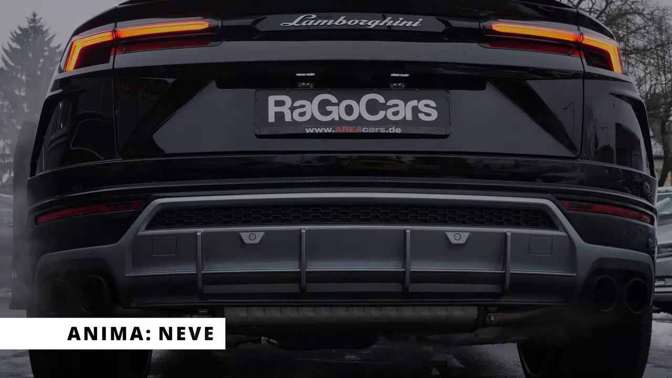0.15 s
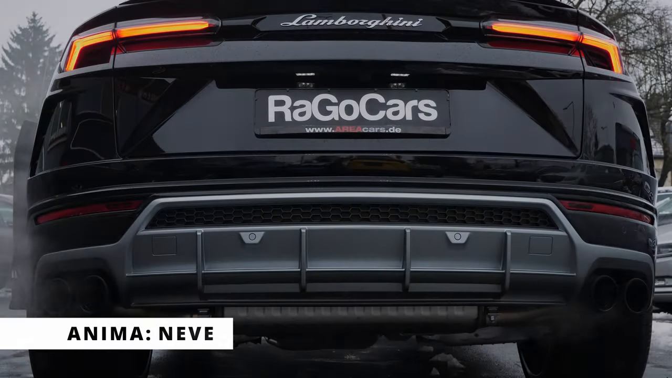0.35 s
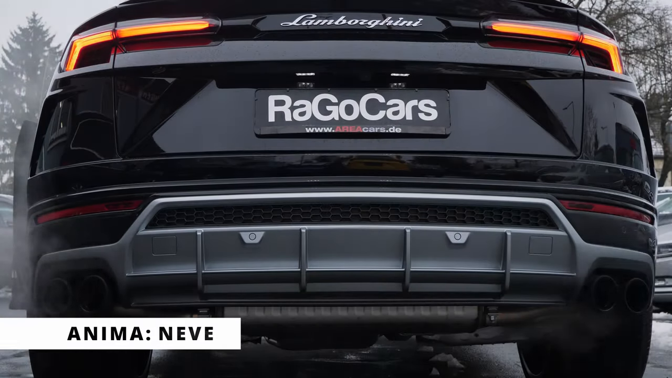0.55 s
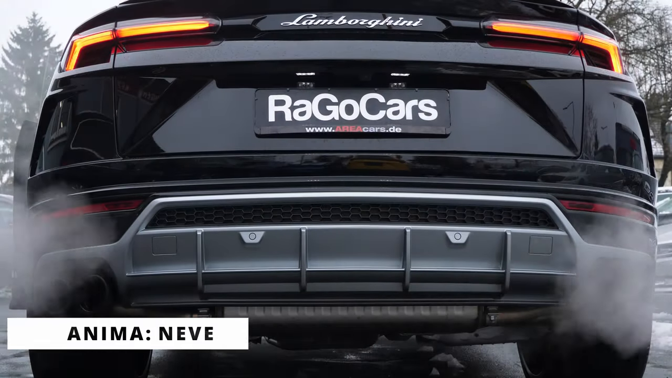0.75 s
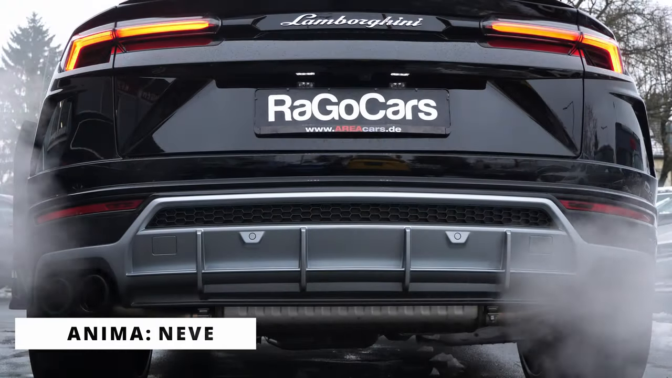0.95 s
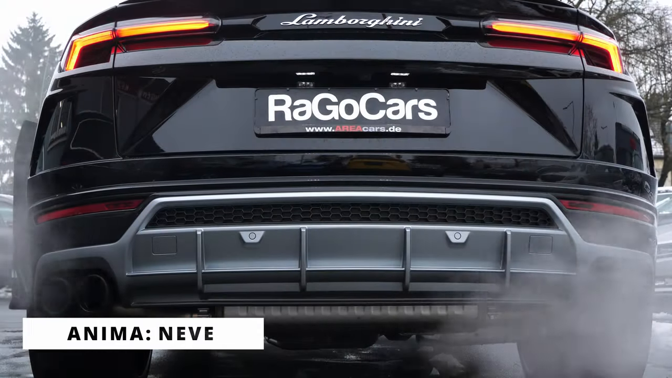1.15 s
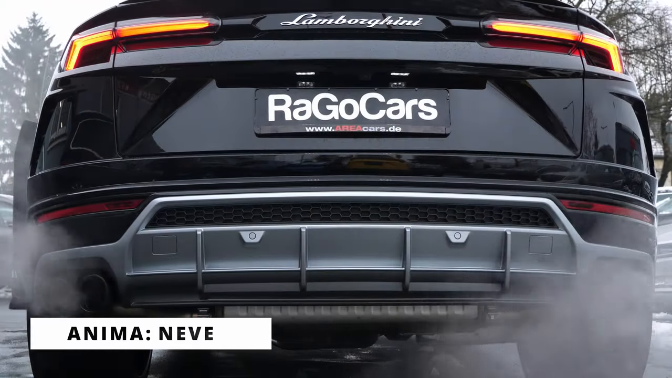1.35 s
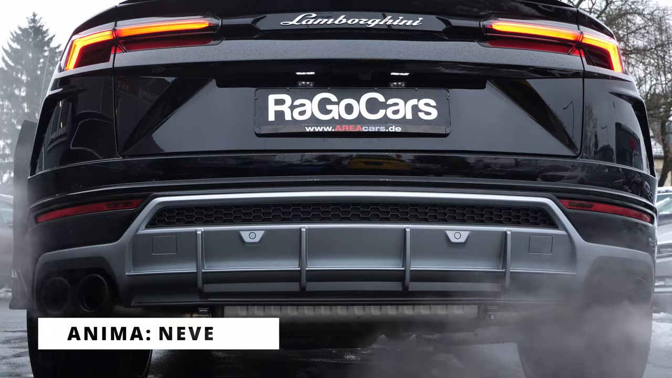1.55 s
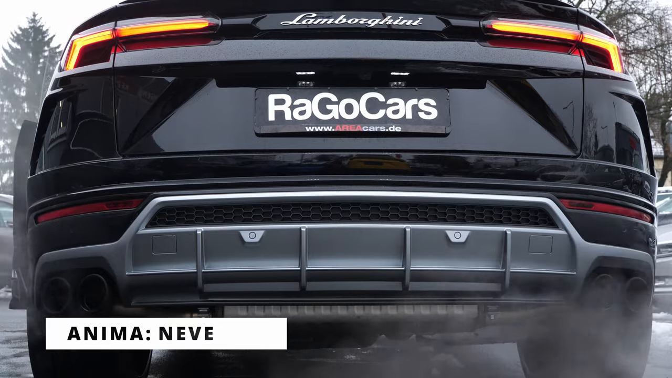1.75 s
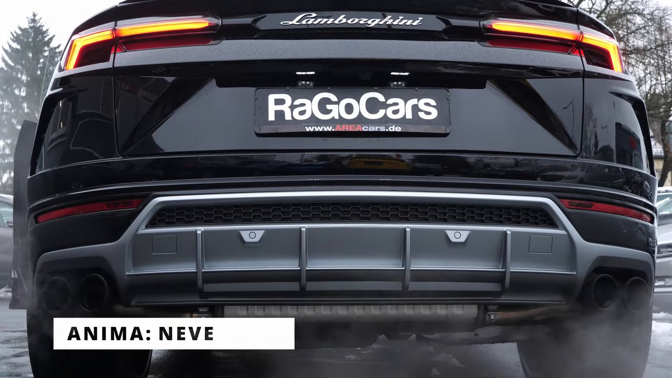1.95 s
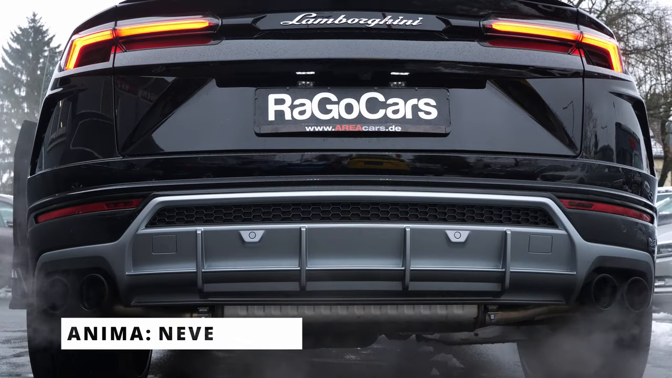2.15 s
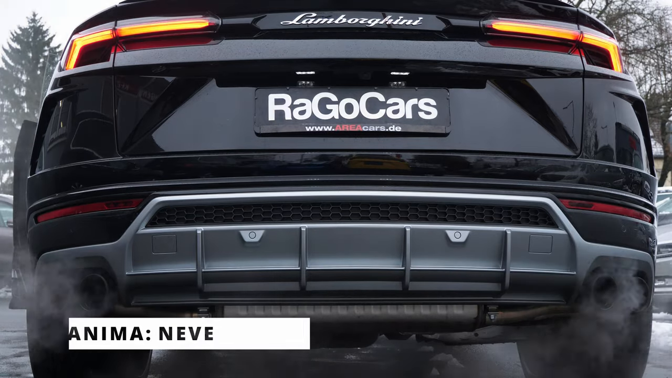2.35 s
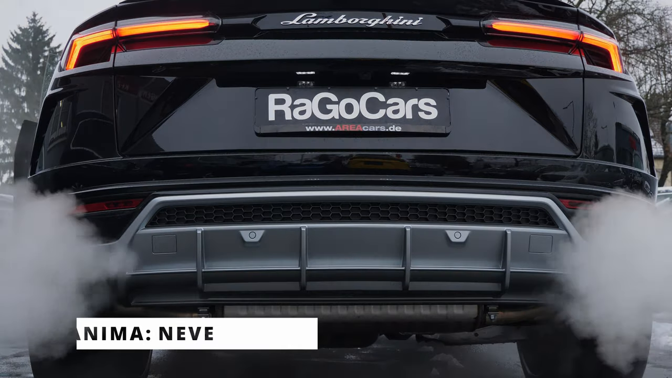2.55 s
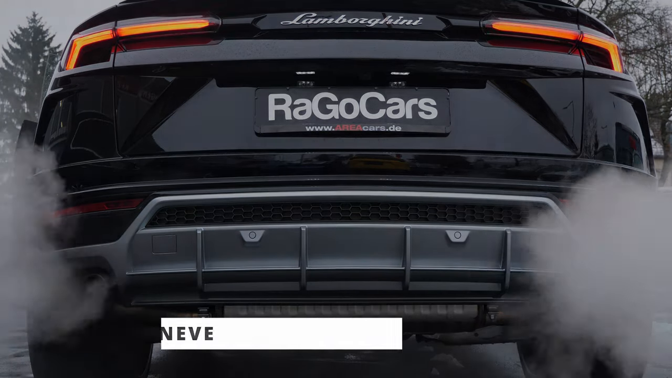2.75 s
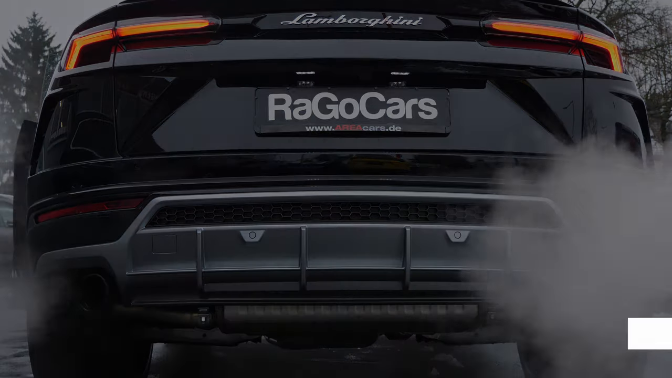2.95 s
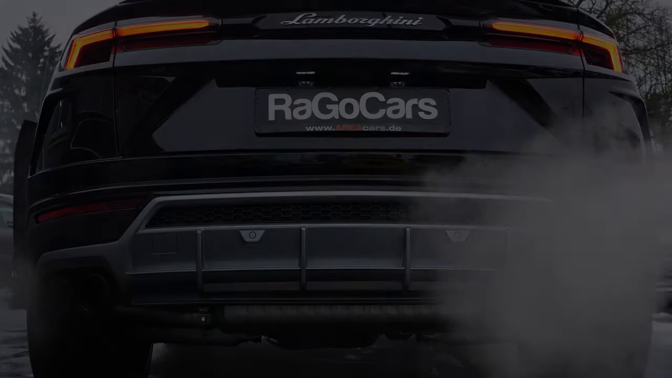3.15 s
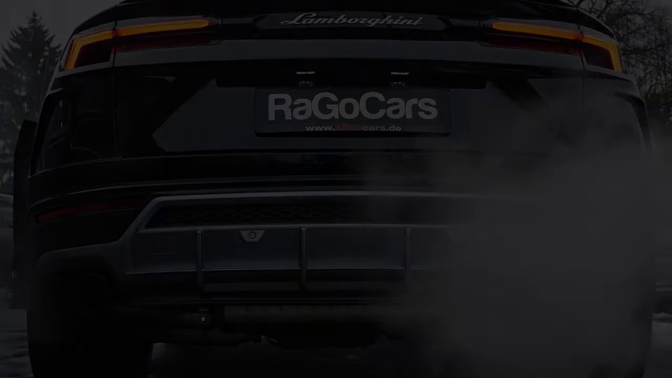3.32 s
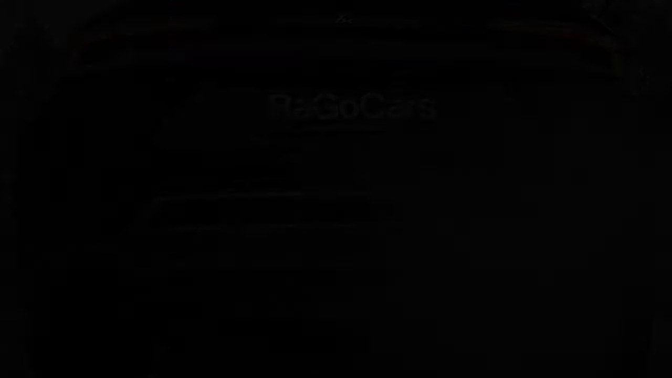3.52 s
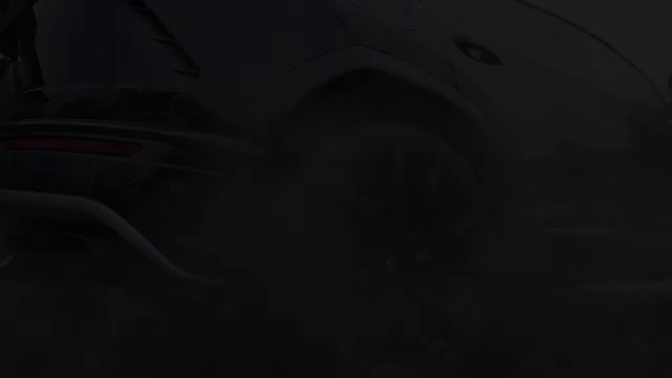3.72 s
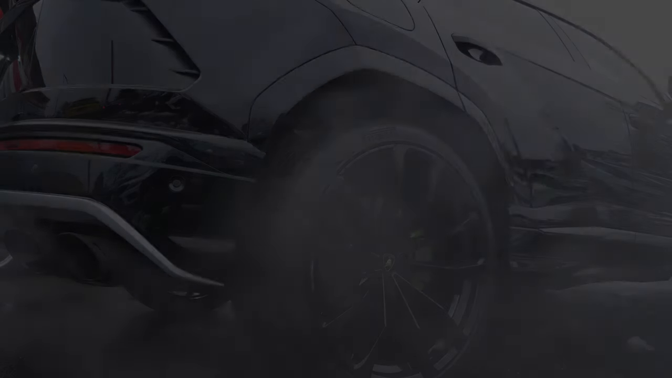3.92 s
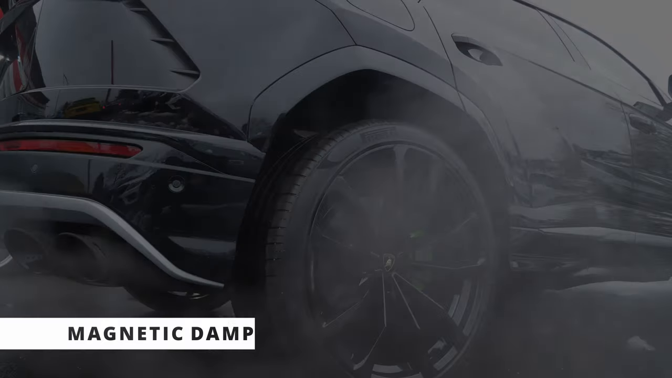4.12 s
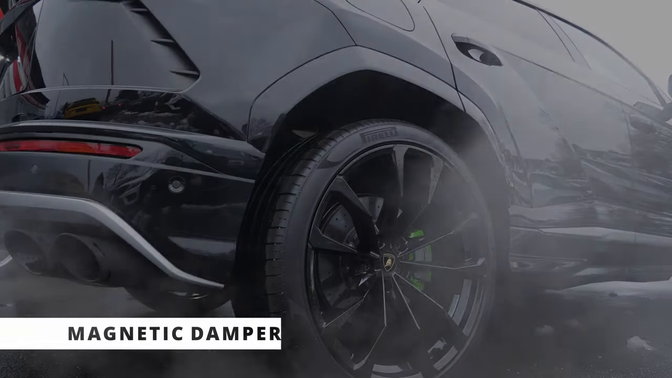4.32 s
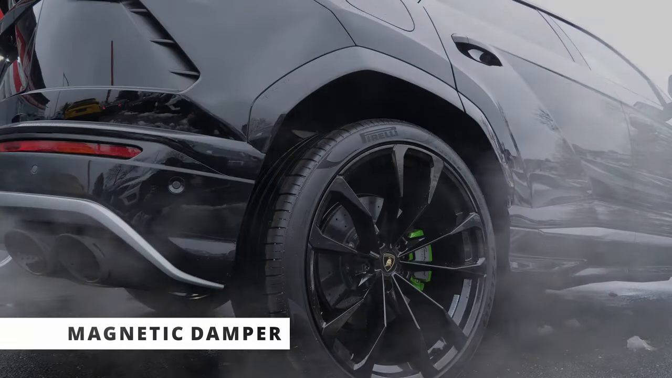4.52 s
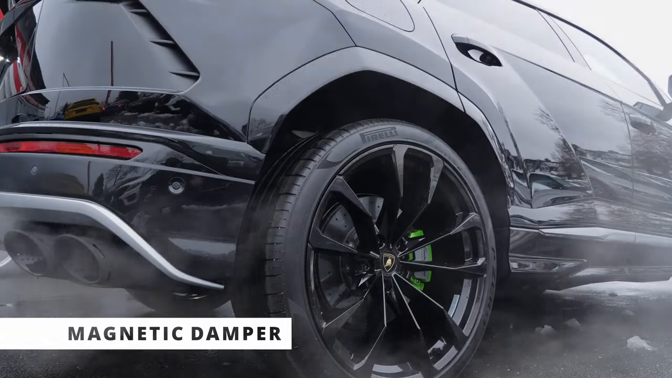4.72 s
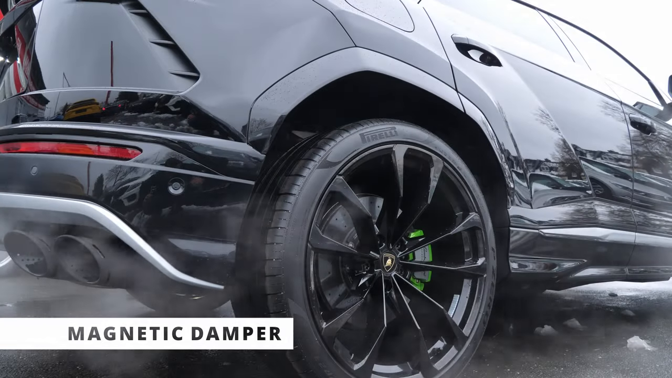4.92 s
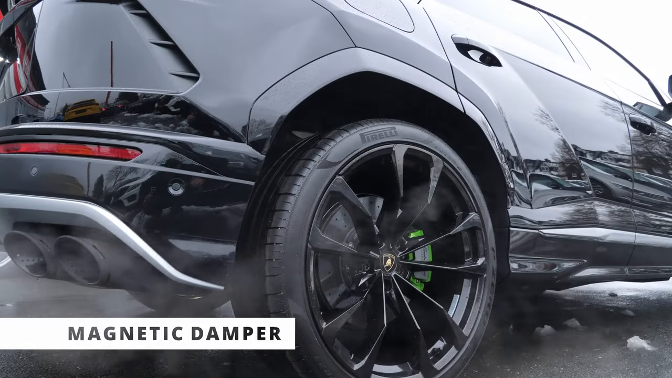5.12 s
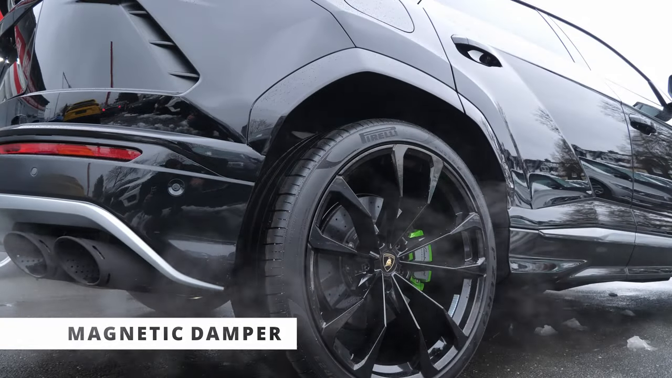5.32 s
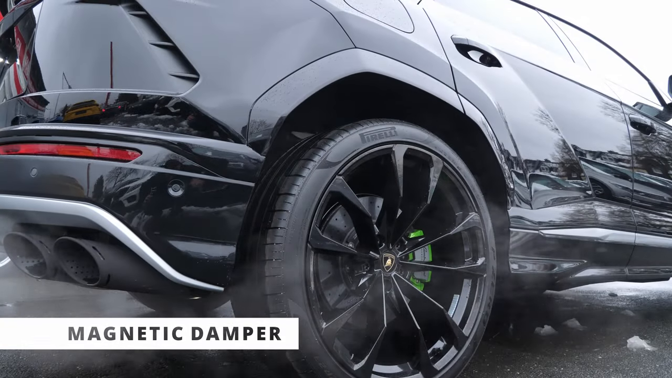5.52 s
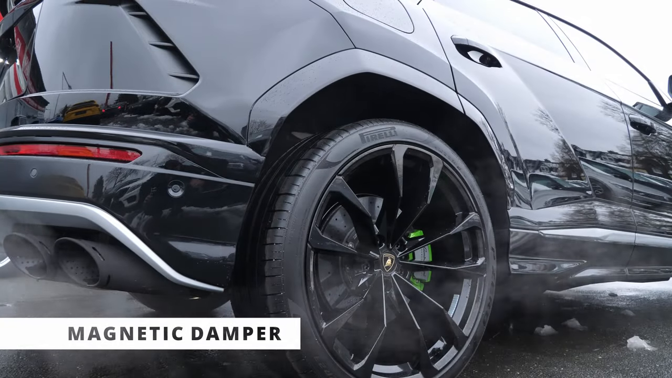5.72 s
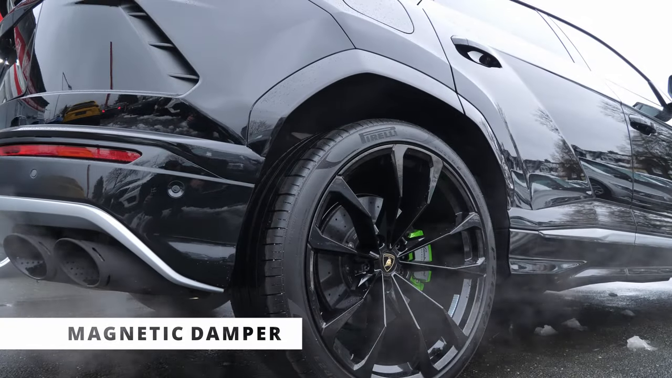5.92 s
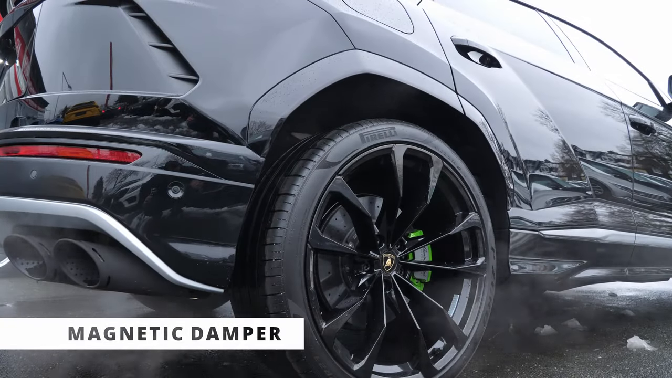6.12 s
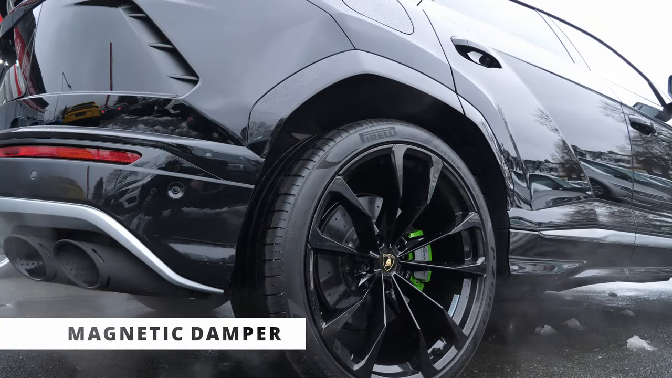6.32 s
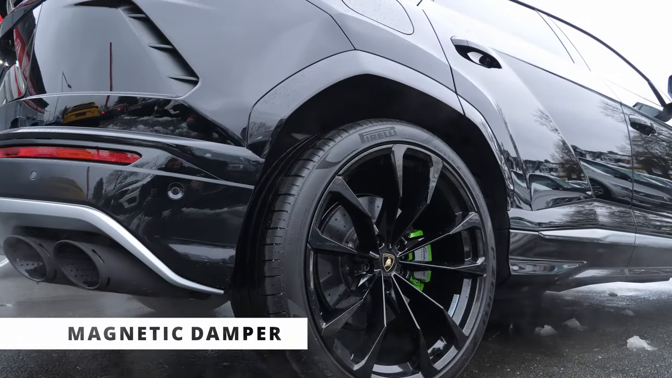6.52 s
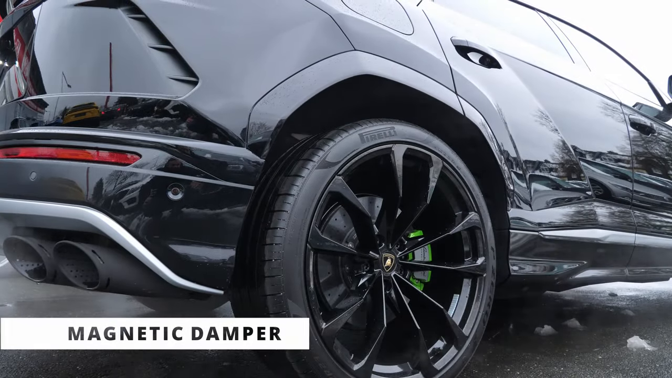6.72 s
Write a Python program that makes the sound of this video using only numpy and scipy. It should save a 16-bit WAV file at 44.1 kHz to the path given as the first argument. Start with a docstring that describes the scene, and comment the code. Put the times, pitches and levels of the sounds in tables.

```python
"""A cross-plane V8 idles in an open lot, heard from behind its tailpipes; it is blipped twice and pops on the overrun.
Each firing is a click that drives boom, bark and rasp filters, with noise for the gas; bangs, hiss and whistles join in.
The sound fades out and back in beside the rear wheel, where filtered pulses throb lumpily over a wash of noise
and something in the exhaust, probably a valve flap, clacks in step with the cylinders as short rings and noise."""
import sys
import numpy as np
from scipy import signal
from scipy.fft import rfft, irfft
from scipy.io import wavfile
from scipy.ndimage import uniform_filter1d

SR = 44100
rng = np.random.default_rng(int(sys.argv[2]) if len(sys.argv) > 2 else 0)


def digitize_waveform(pressure):
    """Quantize a signal to 16-bit integers and store it at the path in sys.argv[1].

    Rows of a 2-D input are taken as channels; values are limited to [-1, 1].
    """
    field = np.atleast_2d(pressure).T
    bounded = np.clip(field, -1, 1)
    quanta = np.round(bounded * 32767).astype(np.int16)
    wavfile.write(sys.argv[1], SR, quanta)


N = 302967
TIME = np.arange(N) / SR  # s


def amp(db):
    """Decibels to gain."""
    return 10 ** (np.asarray(db) / 20)


def curve(rows):
    """The second column of a time table, drawn as straight lines at every sample."""
    seconds, values = np.transpose(rows)
    return np.interp(TIME, seconds, values)


def press(start, end, rise_s, fall_s):
    """A control that rises to 1, holds and dies away."""
    return np.clip((TIME - start) / rise_s, 0, 1) * np.exp(-np.maximum(TIME - end, 0) / fall_s)


def unit(x):
    """Scales to rms 1."""
    return x / np.sqrt(np.mean(x ** 2) + 1e-20)


def steady(x):
    """Scales to rms 1 over every few firings, whatever the engine speed."""
    power = uniform_filter1d(uniform_filter1d(x ** 2, size=4200), size=2400)
    return x / np.sqrt(abs(power) + 1e-12)


def noise():
    """White noise."""
    return rng.standard_normal(N)


def drift(seconds):
    """A random wander of rms 1, with a new target every so many seconds."""
    knots = np.arange(0, TIME[-1] + seconds, seconds)
    return unit(np.interp(TIME, knots, rng.standard_normal(len(knots))))


def colour(x, points, modes=()):
    """Causal minimum-phase filter with a broad spectrum and narrow resonant lifts."""
    f = abs(np.fft.fftfreq(8192, 1 / SR))
    hz, db = np.transpose(points)
    db = np.interp(np.log(f + 1), np.log(hz), db)
    for centre, width, lift in modes:
        db = db + lift / (1 + (2 * (f - centre) / width) ** 2)
    response = np.fft.ifft(np.exp(np.conj(signal.hilbert(np.log(amp(db)))))).real
    return signal.oaconvolve(x, response[:len(f) // 2])[:N]


def resonate(x, hz, width):
    """Rings one narrow resonance, a pair of equal poles, and scales it to rms 1."""
    pole = np.exp((2j * hz - width) * np.pi / SR)
    return unit(signal.lfilter([1], np.poly([pole, pole]), x).real)


def below(x, hz):
    """The part of a sound under hz, with no delay."""
    return irfft(rfft(x) / (1 + (np.fft.rfftfreq(N, 1 / SR) / hz) ** 10), N)


def clicks(times, sizes):
    """Impulses at the given times, each shared between its two nearest samples."""
    at = np.clip(times * SR, 0, N - 2)
    whole, part = at.astype(int), at % 1
    return np.bincount(whole, sizes * (1 - part), N) + np.bincount(whole + 1, sizes * part, N)


def linger(x, decay_s):
    """Gives each impulse an exponential tail."""
    return signal.lfilter([1], [1, -np.exp(-1 / (SR * decay_s))], x)


def add(mix, s, sound):
    """Mixes a sound in at time s."""
    part = mix[max(round(s * SR), 0):][:len(sound)]
    part += sound[:len(part)]


def pings(times, sizes, pitches, rise_s, order=3):
    """Short rings that swell to their peak at the given times and die; a high order makes them rounder."""
    out, t = np.zeros(N), TIME[:SR // 50]
    shape = (t / rise_s * np.exp(1 - t / rise_s)) ** order
    for s, size, hz, turn in zip(times, sizes, pitches, rng.random(len(times))):
        add(out, s - rise_s, size * shape * np.cos(2 * np.pi * (hz * t + turn)))
    return out


def swells(times, sizes, rise_s):
    """Soft humps that start at the given times, peak after rise_s and die away."""
    out, t = np.zeros(N), TIME[:SR // 20]
    for s, size, rise in zip(times, sizes, rise_s):
        add(out, s, size * (t / rise * np.exp(1 - t / rise)) ** 2)
    return out


def firings(speed, start, first_s):
    """Times and cylinder numbers of all firings, set so that cylinder number start fires at first_s."""
    count = np.cumsum(curve(speed)) / SR
    count -= np.interp(first_s, TIME, count)
    number = np.arange(np.ceil(count[0]), count[-1])
    return np.interp(number, count, TIME), (number.astype(int) + start) % 8


def scatter(x, t60):
    """Sparse reflections from the ground, the car body and the lot; t60 in seconds."""
    t = TIME[:SR // 2]
    present = (rng.random(len(t)) < 2000 / SR) * (t > .003)
    taps = rng.standard_normal(len(t)) * present * amp(-60 * t / t60)
    return signal.oaconvolve(x, taps / np.linalg.norm(taps))[:N]


# How far the reflections open out the stereo, before the overall width setting.
# Each row: frequency in Hz, side over mid in dB.
STEREO_WIDTH = [(60, -74), (140, -49.5), (380, -23), (700, -11), (1300, -4.5), (4400, -4.5), (8000, -15.5),
                (15000, -9.5)]


def spread(x, width_db):
    """Reflections reach the two sides with opposite sign; the bass stays in the middle."""
    side = amp(width_db) * colour(scatter(x, t60=0.12), STEREO_WIDTH)
    return np.array([x + side, x - side])


# Engine speed behind the car. Each row: time in seconds, firings per second.
REV_SPEED = [(0.0, 42.74), (0.59, 42.2), (0.675, 68.05), (0.756, 104.64), (0.81, 119), (0.87, 130),
             (0.94, 133), (1.02, 124), (1.112, 113), (1.201, 103), (1.29, 90.5), (1.397, 80.5), (1.5, 73.3),
             (1.65, 63.6), (1.829, 55.5), (2.05, 50), (2.28, 47.5), (2.387, 54), (2.46, 84), (2.526, 107),
             (2.58, 114.5), (2.65, 116.8), (2.757, 109.25), (3.05, 84.5), (3.296, 61.5), (3.62, 50.32)]
# Presses of the pedal. Each row: pedal down in seconds, rasp breaks out in seconds, pedal up in seconds.
BLIPS = [(0.577, 0.588, 0.82), (2.26, 2.396, 2.514)]
# Overrun, when fuel burns late in the pipes as the revs fall.
# Each row: start in seconds, end in seconds, strength from 0 to 1.
OVERRUNS = [(.96, .99, .55), (1.2, 1.29, 0.8), (1.66, 1.85, .2), (2.80, 2.97, 0.9)]
IDLE_RATE = 42  # firings per second
THROTTLE_FALL_S, OVERRUN_RISE_S = 0.16, 0.051


def driving():
    """The pedal sets off the load, which starts later; overrun comes in spells as the revs fall."""
    speed = curve(REV_SPEED)
    pedal = sum(press(down, up, 0.041, THROTTLE_FALL_S) for down, _, up in BLIPS)
    load = sum(press(start, up, 0.045, THROTTLE_FALL_S) for _, start, up in BLIPS)
    overrun = sum(strength * press(start, end, OVERRUN_RISE_S, 0.099) for start, end, strength in OVERRUNS)
    idling = np.clip(45 / speed, 0, 1) ** .35  # combustion evens out as the speed rises
    return speed, pedal, load, overrun, idling


def law_db(law, speed, load, overrun):
    """Level of a layer in dB as the engine speeds up, pulls and overruns."""
    return np.array(law) @ np.array([np.ones(N), np.log2(speed / IDLE_RATE), load, overrun])


# Strength of the eight cylinders in firing order, heard from behind; it evens out with speed.
# Each entry: level in dB at idle.
REAR_CYLINDERS = [2.4, .5, -2.3, -1.4, 2.8, .5, -1.9, -1]


def rear_firings(speed, overrun):
    """Each firing sends a pressure pulse and a puff of gas down the pipes; on the overrun the firings stumble."""
    times, cylinder = firings(REV_SPEED, start=1, first_s=.0098)
    strength, timing, ragged_timing, ragged_strength = rng.standard_normal((4, len(times)))
    slow = np.interp(times, TIME, np.clip(IDLE_RATE / speed, 0, 1))
    stumble = np.interp(times, TIME, overrun)
    stray_db = 1.2 * slow + 5 * stumble
    stray_s = .00027 * slow + .0016 * stumble
    sizes = amp(slow ** 2 * np.take(REAR_CYLINDERS, cylinder) + stray_db * np.clip(strength, -2, 1))
    pulses = clicks(times + stray_s * timing, sizes)
    ragged = clicks(times + .00016 * ragged_timing, np.sqrt(sizes) * amp(1.4 * ragged_strength))
    puffs = steady(linger(ragged, decay_s=.005))
    return times, steady(pulses), steady(ragged), puffs


# Colour of the boom. Each row: frequency in Hz, relative level in dB.
BOOM = [(30, -47), (50, -38), (65, -21), (80, -17), (100, -2), (125, 3), (160, 6), (190, -2), (225, 6.5),
        (255, -11.5), (290, -18.5), (400, -12.5), (900, -60.5)]
# The exhaust drones at some engine speeds and is lean at others.
# Each row: firings per second, boom level in dB before pedal and overrun.
DRONE = [(42, -31), (48, -31.5), (58, -29.5), (73, -25.5), (88, -30.5), (104, -30.5), (118, -27),
         (134, -29)]


def boom(speed, pedal, load, overrun, idling, pulses, puffs):
    """Low pressure pulses of the firings, roughened by the puffs of gas."""
    # the pedal swells the boom most while the engine is still slow
    level_db = np.interp(speed, *np.transpose(DRONE)) + 2 * pedal * idling ** 2 + overrun
    tone = colour(pulses + (.22 + .25 * load + .3 * overrun) * puffs * noise(), BOOM)
    # the firings falter around the two big backfires, and flutter throughout
    falter_db = -4 * press(1.235, 1.335, .015, .015)
    tone = steady(tone) * amp(falter_db + .7 * drift(.025))
    # the deepest part is thin at idle and fills in with speed
    bass_db = np.interp(speed, [50, 105], [-4.5, 2.5])
    bass = below(tone, 109)
    # overtones above 180 Hz drop while the engine coasts with the throttle shut
    coast_db = -5 * press(1.05, 1.17, OVERRUN_RISE_S, .03)
    overtones = tone - below(tone, 180)
    return amp(level_db) * (tone + (amp(bass_db) - 1) * bass + (amp(coast_db) - 1) * overtones)


# Colour of the bark. Each row: frequency in Hz, relative level in dB.
BARK = [(30, -54), (150, -33.5), (260, -9), (340, -2), (400, -6.5), (480, -6), (620, -8), (720, -9.5),
        (840, -7), (950, -24.5), (1300, -22.5), (3000, -54)]
# Standing waves in the tailpipes. Each row: frequency in Hz, width in Hz, lift in dB.
PIPE_MODES = [(332, 100, 3.5), (461, 31, 10), (524.3, 14, 10.5), (607, 24, 8), (790, 30, 2)]
# Loudness of the bark. The entries: level at idle in dB, then rise in dB per doubling of speed,
# under load and on full overrun.
BARK_LAW = (-40.5, 3, 3, 3.5)


def bark(speed, load, overrun, idling, ragged, puffs):
    """Ragged pulses and gas noise excite the standing waves of the tailpipes."""
    tone = colour(ragged + (.35 * puffs + .8 * idling) * noise(), BARK, PIPE_MODES)
    return amp(law_db(BARK_LAW, speed, load, overrun)) * steady(tone)


# Colour of the rasp. Each row: frequency in Hz, relative level in dB.
RASP = [(30, -65), (500, -33.5), (1000, 2), (1180, -10.5), (1400, -5), (1900, -3), (2450, -2.5),
        (3200, -10), (3620, -12.5), (4300, -13), (6000, -17.5), (14000, -53)]
# Higher standing waves in the tailpipes. Each row: frequency in Hz, width in Hz, lift in dB.
RASP_MODES = [(1062, 230, 11), (1353, 220, 12), (1553, 47, 10.5), (1753, 45, 11), (1948, 38, 8.5),
              (2335, 180, 6.5), (3020, 280, 4.5)]
# Loudness of the rasp before the pedal's lift. The entries: level at idle in dB, then rise in dB
# per doubling of speed, under load and on full overrun.
RASP_LAW = (-52, 2.5, 6.5, 3)


def rasp_level(speed, pedal, load, overrun, idling):
    """Level of the rasp in dB; it lifts as soon as the pedal goes down."""
    return law_db(RASP_LAW, speed, load, overrun) + 2.5 * pedal * idling ** 2


def rasp(level_db, drive, times, ragged, puffs):
    """Turbulent gas tears at the pipe mouths; when driven, each puff spits at its own pitch."""
    size, pitch = rng.standard_normal((2, len(times)))
    spits = pings(times + 0.00107, amp(2.4 * size), 2500 * np.exp(.28 * pitch), rise_s=.0008)
    gas = ((.25 + 2.4 * drive) * puffs + 1.7 - .9 * drive) * noise()
    tone = colour(gas + drive * (1.3 * steady(spits) + .9 * ragged), RASP, RASP_MODES)
    return amp(level_db) * steady(tone)


# Colour of the hiss. Each row: frequency in Hz, relative level in dB.
HISS = [(1000, 9.5), (3000, 4.5), (4500, 1), (7000, 0.5), (9500, -1), (12000, -6.5), (15000, -17)]
# Level of the hiss behind the car as the engine revs and falls back.
# Each row: time in seconds, level in dB.
HISS_LEVEL = [(0, -57), (.52, -55.5), (.66, -45), (.88, -58), (1.03, -54), (1.13, -58), (1.29, -51),
              (1.46, -61.5), (1.66, -52), (1.86, -58), (2.45, -49), (2.72, -65), (2.92, -57.5),
              (3.14, -61.5), (3.3, -55)]


def hiss(drive, puffs):
    """Bright gas noise that pulses a little with the puffs."""
    return amp(curve(HISS_LEVEL)) * steady(colour(((.08 + .2 * drive) * puffs + 1) * noise(), HISS))


# Narrow whistles of the gas flow. Each row: frequency in Hz, nominal width in Hz, relative level in dB.
WHISTLES = [(762, 8, -13), (811, 9, -4.5), (2300, 420, -21), (3680, 450, -23), (4500, 120, -30),
            (5840, 300, -28), (6890, 260, -23), (9400, 350, -28)]


def whistles(speed):
    """Gas flow at low speed excites narrow resonances, each wavering in strength."""
    out = np.zeros(N)
    for hz, width, db in WHISTLES:
        out += amp(db + .6 * drift(.12)) * resonate(noise(), hz, 0.6 * width)
    # full below 48.5 firings per second, silent above 56
    return amp(-44.5) * np.clip((56 - speed) / (56 - 48.5), 0, 1) * out


def revs():
    """The firings drive every exhaust layer behind the car from one set of pulses and puffs."""
    speed, pedal, load, overrun, idling = driving()
    times, pulses, ragged, puffs = rear_firings(speed, overrun)
    rasp_db = rasp_level(speed, pedal, load, overrun, idling)
    drive = np.clip((rasp_db + 49.5) / 10, 0, 1)  # a louder rasp is also rougher
    exhaust = boom(speed, pedal, load, overrun, idling, pulses, puffs)
    exhaust += bark(speed, load, overrun, idling, ragged, puffs)
    exhaust += rasp(rasp_db, drive, times, ragged, puffs)
    return exhaust + hiss(drive, puffs) + whistles(speed)


# The loudest bangs in the exhaust, levels before the layers are balanced.
# Each row: time in seconds, thump in dB, crack in dB, crack pitch in Hz.
POPS = [(0.6183, -24, -25.5, 2830), (0.638, -32, -32, 2300), (.655, -36, -31, 2500),
        (0.675, -40, -38, 2700), (0.696, -45, -25, 1950), (0.712, -23, -30, 2900), (.799, -21, -32, 2220),
        (.8478, -58, -32, 2300), (0.969, -29, -29.5, 2430), (1.045, -19, -55, 2300),
        (1.2733, -12.5, -31, 2580), (1.3213, -11, -27.5, 2880), (1.344, -43, -32, 2700),
        (1.378, -19.5, -37, 2780), (1.391, -24, -36, 3000), (1.457, -29, -34.5, 3020),
        (1.722, -27, -47, 2400), (2.365, -17, -41, 2380), (2.38, -16.5, -32, 2380),
        (2.4289, -38, -20, 2500), (2.444, -24, -34, 3260), (2.47, -41, -34, 2940), (2.51, -45, -28, 2170),
        (2.521, -37, -29, 2350), (2.536, -19, -27.5, 2410), (2.739, -23.5, -33.5, 2410),
        (2.885, -33, -30, 2270), (2.969, -36, -32, 1900), (3.062, -32, -31, 2340)]


def pops():
    """Hard firings and backfires thump the pipes and crack at their mouths."""
    times, thump_db, crack_db, crack_hz = np.transpose(POPS)
    one = clicks(np.zeros(1), np.ones(1))
    blows = clicks(times, amp(thump_db))
    thump = colour(blows, BOOM) / colour(one, BOOM).max()
    shocks = clicks(times, amp((thump_db + crack_db) / 2))  # sharper bangs ring the pipes harder
    ring = colour(shocks, BARK, PIPE_MODES) / colour(one, BARK, PIPE_MODES).max()
    burst = linger(clicks(times, amp(crack_db)), decay_s=0.018) * noise()
    snap = pings(times + .001, amp(crack_db), crack_hz, rise_s=.0009)
    sizzle = linger(blows, decay_s=0.0063) * noise()  # gas rushes out behind the bang
    bang = .7 * thump + 1.1 * ring + .6 * snap
    return bang + 0.46 * colour(burst, RASP) + 0.032 * colour(sizzle, HISS)


def valve():
    """A thin whistle of air, perhaps a boost valve, swells and fades as the revs fall."""
    swell = np.exp(-((TIME - 1.67) / .09) ** 2)
    return amp(-71) * swell * resonate(noise(), hz=8450, width=320)


# Colour of the throb. Each row: frequency in Hz, relative level in dB.
THROB = [(25, -50), (50, -33), (75, -41), (100, -18.5), (125, -15), (150, 1), (200, 1.3), (250, -4.5),
         (300, -10.5), (370, -40), (460, -29), (560, -33), (820, -25.5), (1500, -55), (5000, -82)]


def throb(pulses):
    """Uneven pulses from the two banks throb in the pipe."""
    return -amp(-31.0) * unit(colour(pulses, THROB))


# Colour of the wash. Each row: frequency in Hz, relative level in dB.
WASH = [(25, -27), (80, -5), (125, 6.5), (200, 6.5), (330, 5), (385, 2), (420, 7.5), (470, 6.5), (520, 2),
        (620, 0.5), (1000, 4.5), (1500, -7), (2500, -14), (4000, -20), (6500, -25), (9500, -26.5),
        (12000, -33.5), (15000, -37.5)]
# Resonances in the wash. Each row: frequency in Hz, width in Hz, lift in dB.
WASH_MODES = [(460, 36, 4), (12850, 800, 4)]


def gas_wash(pulses):
    """Gas and fan noise that breathes with the pulses and grows slowly."""
    breath = 1 + .5 * unit(linger(pulses, decay_s=.014))
    swell_db = 0.37 * (TIME - 6)  # dB per second
    return amp(-36 + swell_db) * unit(colour(breath * noise(), WASH, WASH_MODES))


# Knocks of the flap that stand out. Each row: time in seconds, level in dB, pitch in Hz.
SLAMS = [(3.994, -22, 1080), (4.213, -23, 1030), (4.25, -22.5, 1010), (4.3095, -19.5, 1010),
         (4.470, -24, 1000), (4.531, -21.5, 1210), (4.6289, -21.5, 1025), (4.688, -27, 1040),
         (4.7867, -20.5, 1060), (4.946, -21.5, 956), (5.0071, -22.5, 1017), (5.045, -28, 990),
         (5.105, -23, 1020), (5.224, -20, 1030), (5.423, -28, 1010), (5.486, -23, 1077), (5.545, -20, 1070),
         (5.5852, -19, 950), (5.6828, -19.5, 980), (5.744, -26, 1270), (5.808, -28.5, 1300),
         (5.868, -24, 1080), (5.902, -18.5, 975), (5.964, -19.5, 1095), (6.004, -23, 1000),
         (6.063, -20, 1036), (6.123, -21, 1040), (6.222, -17.5, 1030), (6.284, -24, 1040),
         (6.384, -20.5, 1035), (6.484, -20, 1030), (6.543, -21, 1100), (6.664, -19.5, 1135),
         (6.762, -23, 1050)]
KNOCK_LAG_S = 0.002175  # usual wait from a firing to the flap's knock


def knocks_after(times, usual_db):
    """One knock after each firing, as hard as its cylinder pushes, and now and then a rebound."""
    late, soft, high = rng.standard_normal((3, len(times)))
    knock_s = times + KNOCK_LAG_S + 0.00088 * late
    knock_db = usual_db - 4 * soft
    knock_hz = 1035 * np.exp(0.064 * high)
    bounces = rng.random(len(times)) < 0.25
    # each slam takes the place of the nearest knock and never rebounds
    for s, db, hz in SLAMS:
        nearest = np.argmin(abs(knock_s - s))
        knock_s[nearest], knock_db[nearest], knock_hz[nearest], bounces[nearest] = s, db, hz, False
    rebounds = bounces * amp(knock_db - 10)
    return np.r_[knock_s, knock_s + 0.00664], np.r_[amp(knock_db), rebounds], np.r_[knock_hz, knock_hz]


# Colour of the clack. Each row: frequency in Hz, relative level in dB.
CLACK = [(300, -34), (600, -29), (800, -4), (950, 2.5), (1040, 9), (1200, -3), (1380, -8), (1600, -13.5),
         (2400, -26), (4000, -43), (10000, -60)]
# Ringing of the flap and its pipe. Each row: frequency in Hz, width in Hz, lift in dB.
FLAP_MODES = [(787, 110, 8.5), (1053, 410, 6), (1335, 35, 11), (1385, 31, 3), (1790, 98, 16),
              (2520, 100, 10), (3050, 120, 19), (3400, 100, 15), (4600, 91, 14)]


def flap(times, chatter_db, swell_s, knock_db):
    """The flap buzzes on its seat after each firing and knocks, hard after some."""
    knock_s, sizes, knock_hz = knocks_after(times, knock_db)
    knocks = pings(knock_s, sizes, knock_hz, rise_s=.0033, order=10)
    # each knock is wrapped in a short scrape that builds up before it
    contact = signal.oaconvolve(clicks(knock_s, sizes), np.hanning(round(.011 * SR)), "same")
    scrape = unit(colour(contact * noise(), CLACK, FLAP_MODES))
    buzz_sizes = amp(chatter_db + 1.2 * rng.standard_normal(len(times)))
    buzz = swells(times - .0007, buzz_sizes, swell_s)
    chatter = unit(colour(buzz * noise(), CLACK, FLAP_MODES))
    sound = knocks + amp(-49) * scrape + amp(-41.8) * chatter
    return sound + .18 * scatter(sound, t60=.08)


# Colour of the gas spray. Each row: frequency in Hz, gain in dB.
SPLASH = [(300, -43), (800, -14), (1300, 15.5), (1900, -3), (2500, -5.5), (3200, -7), (4200, -30),
          (10000, -43)]


def splashes(times, usual_db):
    """Gas sprays past the flap as it lifts, stronger for some cylinders."""
    sizes = amp(usual_db + 3.5 * np.clip(rng.standard_normal(len(times)), -2, 1))
    gusts = signal.oaconvolve(clicks(times + KNOCK_LAG_S, sizes), np.hanning(round(0.014 * SR)), "same")
    return colour(gusts * noise(), SPLASH)


# Engine speed beside the wheel. Each row: time in seconds, firings per second.
IDLE_SPEED = [(3.62, 49.86), (4.2, 50.32), (4.6, 50.16), (4.95, 50.75), (5.25, 49.81), (5.55, 50.22),
              (5.85, 50.02), (6.25, 49.92), (6.87, 50.43)]
# The cylinders beside the wheel in firing order, levels before balancing and scatter.
# Each row: pulse in dB, delay of the pulse in seconds (negative leads), flap chatter in dB,
# swell of the chatter in seconds, flap knock in dB, splash in dB.
SIDE_CYLINDERS = [(-1.5, -.0039, 0, 0.0037, -29.5, -54), (1.5, .0012, 3, 0.0047, -29.5, -47),
                  (0.5, -.0025, -13, .005, -35, -54), (-2.5, .0016, 5.5, 0.003, -26.5, -42),
                  (-7.5, .0104, -9, 0.0031, -50, -61), (-3, .0017, -18, 0.0062, -42.5, -58),
                  (-1.8, .0018, 4.5, 0.0048, -30, -32.5), (-3, -0.0022, -0.5, 0.0082, -35, -55)]
# The pipe lies to the left of the wheel. Each row: frequency in Hz, share leaning left in dB.
LEAN = [(100, -55), (300, -24.5), (500, -29), (900, -10.5), (1400, -10.5), (2200, -20), (8000, -45)]


def idle():
    """The firings throb in the pipe and shake the flap over a wash of gas; the sound leans left."""
    times, cylinder = firings(IDLE_SPEED, start=1, first_s=3.6296)
    pulse_db, delay, chatter_db, swell_s, knock_db, splash_db = np.array(SIDE_CYLINDERS)[cylinder].T
    timing, strength = rng.standard_normal((2, len(times)))
    pulses = clicks(times + delay + .00007 * timing, amp(pulse_db + .35 * strength))
    wash = gas_wash(pulses)
    direct = throb(pulses) + flap(times, chatter_db, swell_s, knock_db) + splashes(times, splash_db)
    hz, db = np.transpose(LEAN)
    share_db = np.interp(np.log(np.fft.rfftfreq(N, 1 / SR) + 1), np.log(hz), db)
    lean = irfft(rfft(direct + wash) * amp(share_db), N)
    return direct + spread(wash, width_db=-2.5) + np.array([lean, -lean])


def tick():
    """One dry tick close by: a single filtered click."""
    spectrum = [(100, -9), (450, 0), (1500, -7), (5000, -15.5), (9000, -28), (15000, -41)]  # Hz, dB
    snap = colour(clicks(np.array([6.5705]), np.ones(1)), spectrum)
    return -amp(-11.3) * snap / abs(snap).max()


def scene():
    """First behind the car, then beside the wheel from 3.62 s."""
    rear = spread(revs() + pops() + valve(), width_db=-5.0)
    return np.where(TIME < 3.62, rear, idle() + tick())


# The fader. Each row: time in seconds, gain.
FADER = [(0, .55), (.55, 1), (2.65, 1), (3.3, .3), (3.62, 0), (4.3, .52), (4.85, 1)]


def record(dry):
    """The fader dips between the two positions; then a low-pass takes off the top above 15250 Hz."""
    low_pass = signal.firwin(511, 15250, window=("kaiser", 9), fs=SR)
    return signal.oaconvolve(dry * curve(FADER), low_pass[None], "same")


dry = scene()
out = record(dry)
digitize_waveform(out)
```